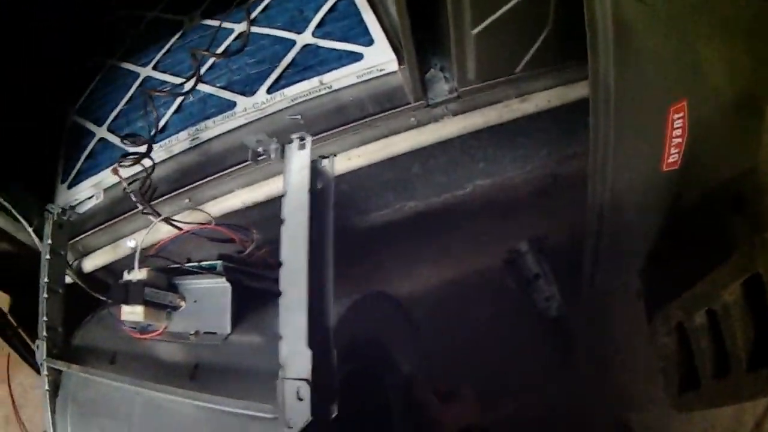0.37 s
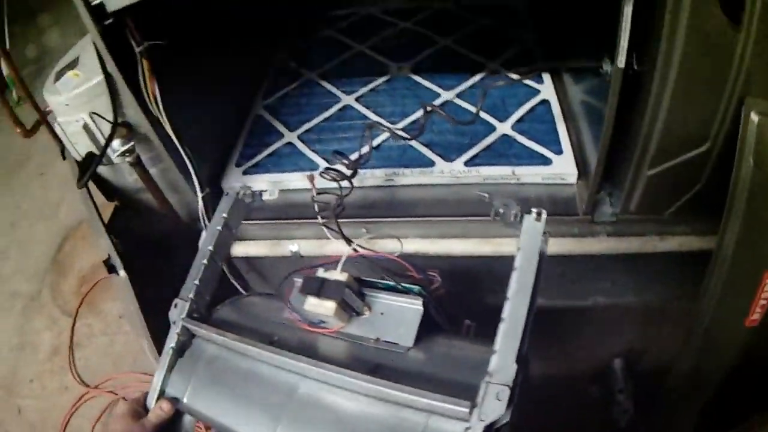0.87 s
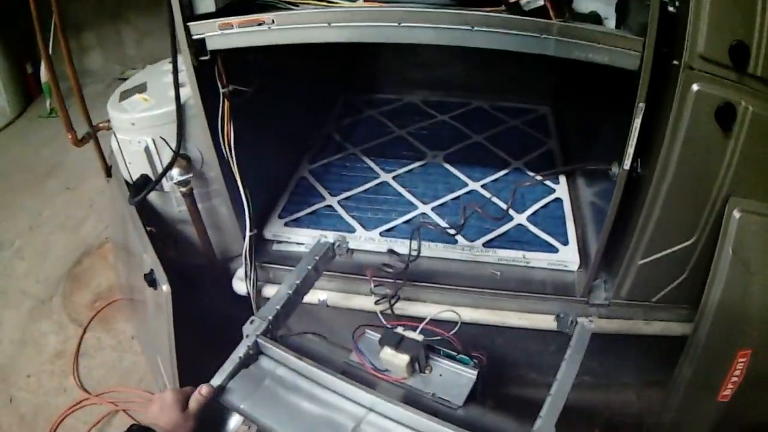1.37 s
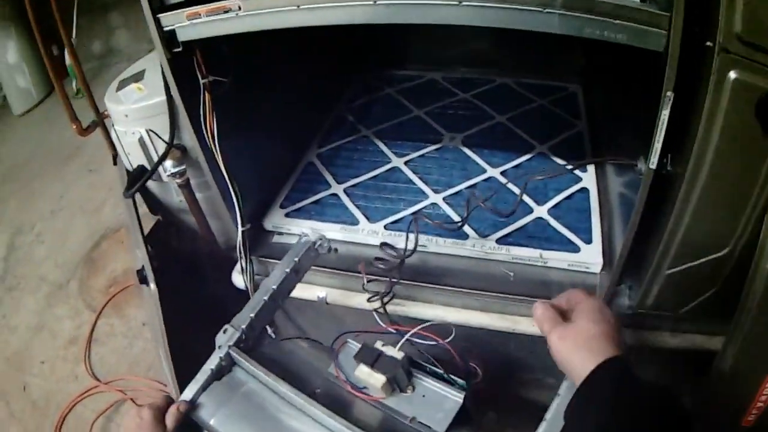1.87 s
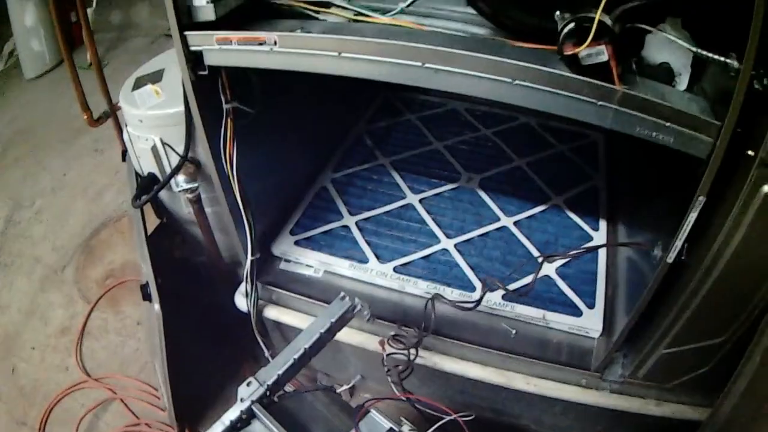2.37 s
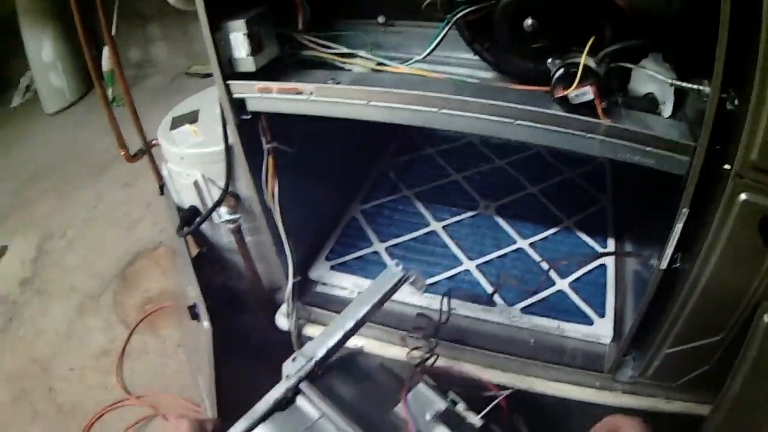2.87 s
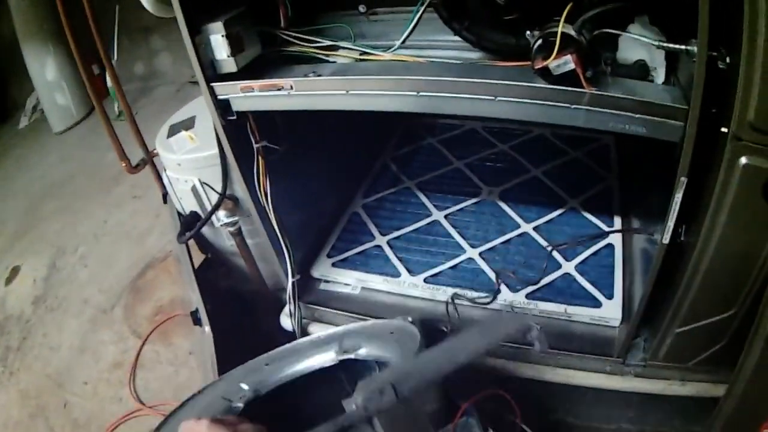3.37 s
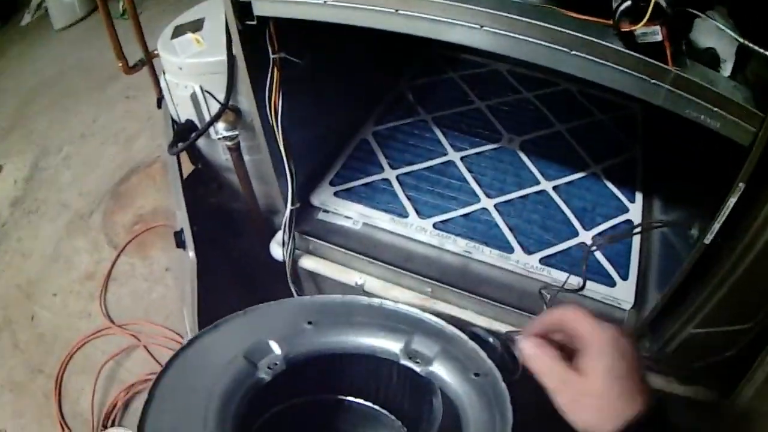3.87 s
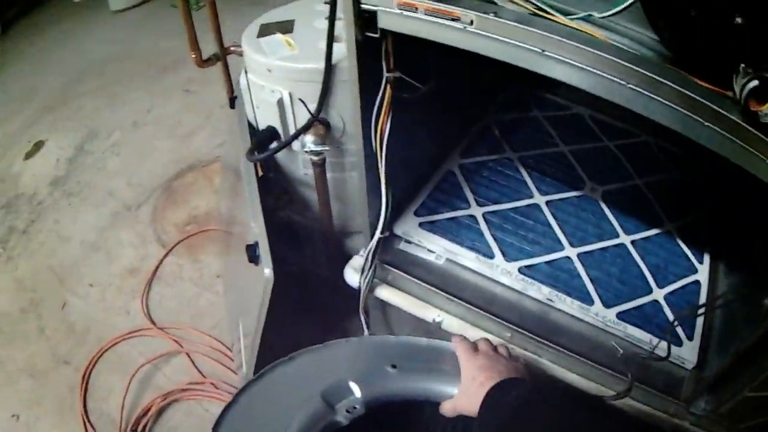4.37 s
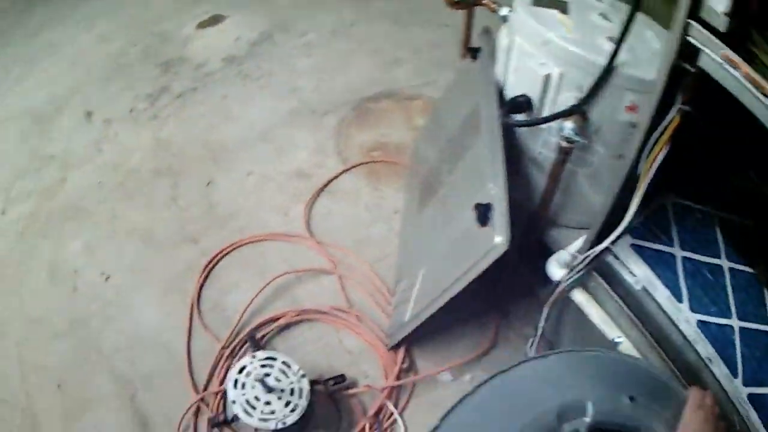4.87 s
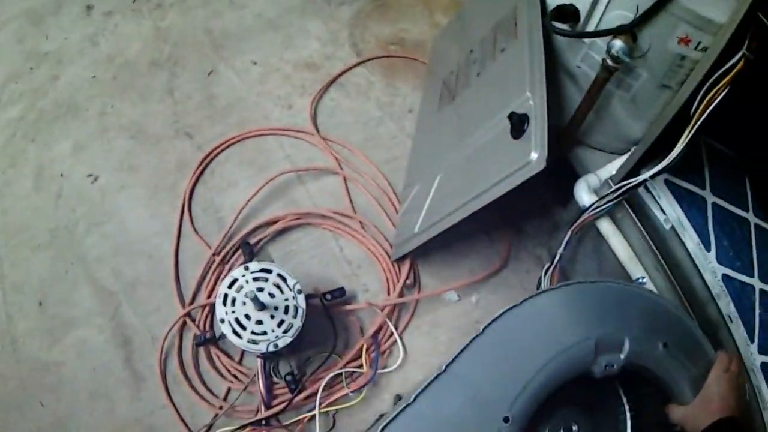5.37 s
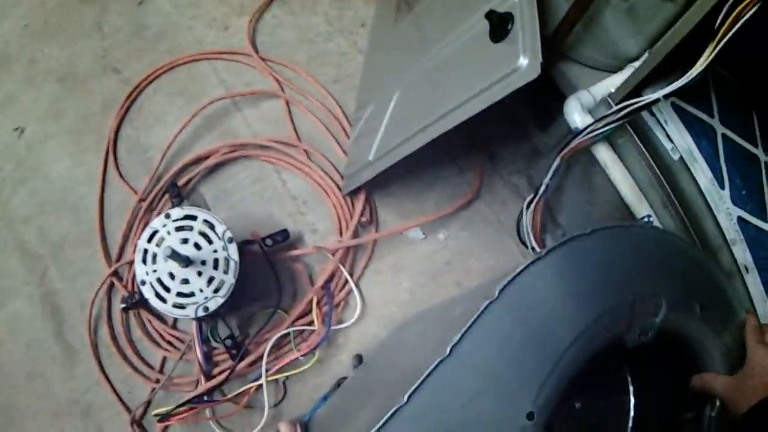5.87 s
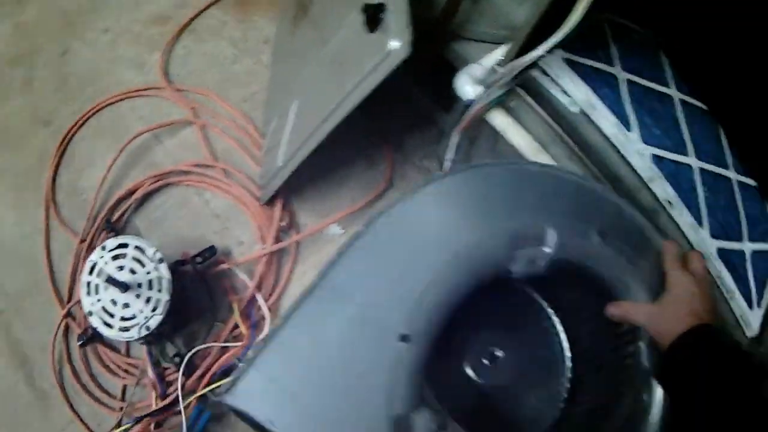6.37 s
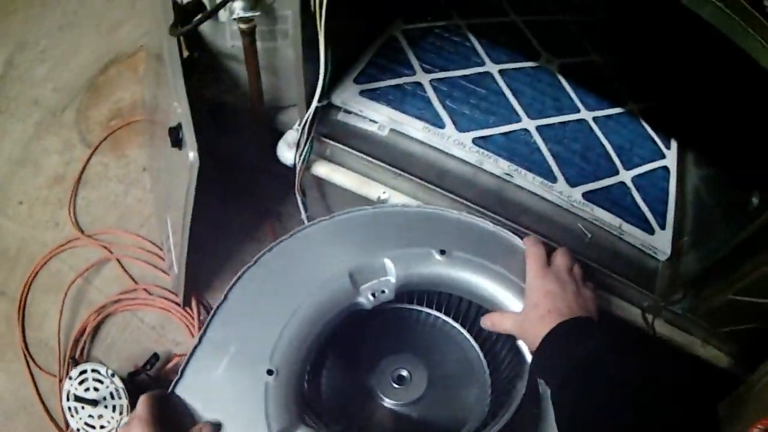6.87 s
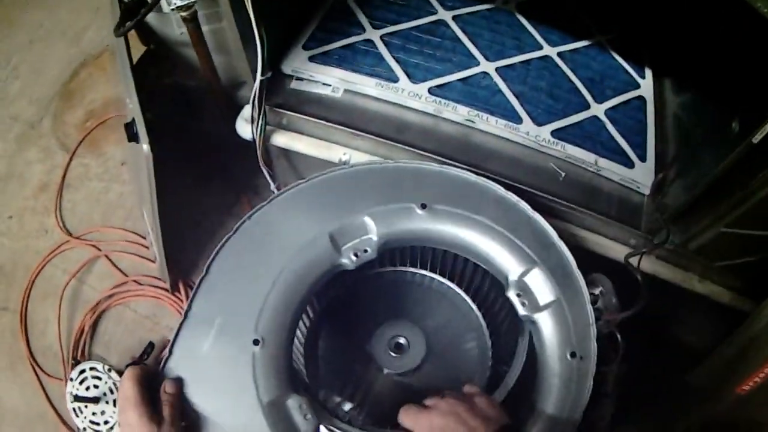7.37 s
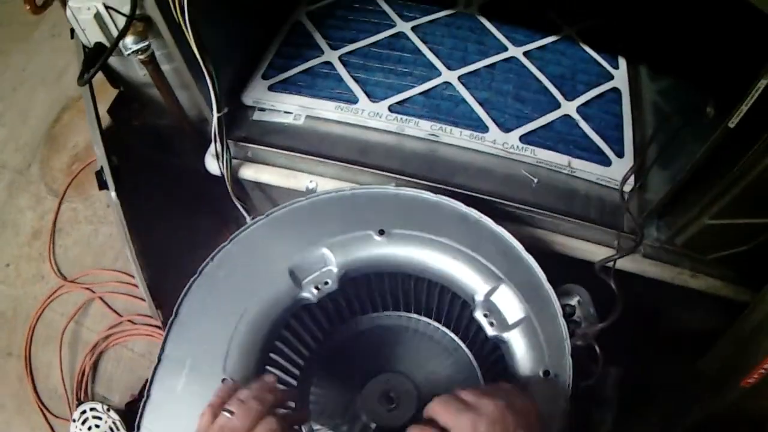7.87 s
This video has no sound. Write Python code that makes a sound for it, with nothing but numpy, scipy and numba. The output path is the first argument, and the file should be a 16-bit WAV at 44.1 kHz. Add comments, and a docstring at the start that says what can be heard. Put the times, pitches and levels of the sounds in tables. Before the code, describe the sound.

Hollow sheet metal handled close to a small body-worn camera on a concrete basement floor. Soft taps give way to isolated bright clanks, then a heavy, ringing set-down. A near-quiet gap follows, then a cluster of knocks with dragging, another strong bang, small bright ticks, a short metallic squeal and continuous uneven rattling. The hard room rings on behind faint hiss and thin whine.

```python
"""A concrete basement floor, where a sheet-metal blower housing is tipped, set down, dragged and rocked.
Knocks are short chatters of noise contacts coloured by the panels; drags are denser, stuttering contacts.
Single faces boom as decaying sines; a sliding edge squeals in rough partials.
Panel modes and a hard room ring on behind.
A small body-worn camera hears it through a narrow port, over its own hiss and whine."""
import sys
import numpy as np
from scipy import signal
from scipy.fft import rfft, irfft
from scipy.io import wavfile
from scipy.ndimage import uniform_filter1d, minimum_filter1d
from numba import njit

SR = 44100
rng = np.random.default_rng(int(sys.argv[2]) if len(sys.argv) > 2 else 0)


def materialize(psi):
    """Save the field psi as 16-bit PCM at rate SR to the path in sys.argv[1].

    A 1-D psi becomes a single channel; in a 2-D psi each row is a channel.
    """
    bounded = np.clip(np.atleast_2d(psi).T, -1, 1)
    quanta = np.round(bounded * 32767).astype(np.int16)
    wavfile.write(sys.argv[1], SR, quanta)


def voltage_ratio(level):
    """Linear amplitude factor for a level in decibels (scalar or array-like)."""
    return 10 ** (np.asarray(level, float) / 20)


N = 352800
BLOCK = 8192  # samples in one knock or squeal

# broad colour of the big panels: hz, relative_db
PANEL = [(40, -63), (150, -12.5), (300, -6), (600, -3.5), (1000, -3), (1600, -4), (2100, -14), (2600, -24),
         (3500, -78)]
# ringing of the edges, a band the port lifts: hz, relative_db
EDGE = [(2000, -41), (2600, -7.5), (3200, 0), (3800, -4), (4500, -18), (6000, -37)]
# bright ticks of hard contact: hz, relative_db
TICK = [(3500, -30.5), (5000, 3), (7000, -2.5), (10000, -4), (12500, -11)]


def level(x, db):
    """Scale to an rms level."""
    return x * voltage_ratio(db) / np.sqrt(np.mean(x ** 2))


def shape(table, size):
    """Gain on the frequency bins, unit power, from (hz, db) points on a log axis."""
    hz, db = np.transpose(table)
    bins_hz = np.fft.rfftfreq(size, 1 / SR)
    gain = voltage_ratio(np.interp(np.log(bins_hz + 1), np.log(hz), db))
    return gain / np.sqrt(np.mean(gain ** 2))


def colour(x, table):
    """Filter a full-length signal by a spectrum."""
    return irfft(rfft(x) * shape(table, N), N)


def contacts(size, spread_db):
    """Noise whose samples have heavy-tailed sizes: many light touches, a few hard ones."""
    hardness = np.minimum(rng.exponential(size=size), 4)
    return level(rng.standard_normal(size) * voltage_ratio(spread_db * hardness), 0)


def wander(size, span):
    """Smooth chance of unit rms that holds for about span samples."""
    once = uniform_filter1d(rng.standard_normal(size), span)
    return level(uniform_filter1d(once, span), 0)


def add(track, start_s, x):
    """Mix a sound in at a time."""
    i = int(start_s * SR)
    track[i:i + len(x)] += x[:N - i]


@njit
def resonate(x, hz, sharpness):
    """State-variable band-pass of gain 1 whose centre moves."""
    y, band, low = np.empty(len(x)), 0., 0.
    for i in range(len(x)):
        g = np.tan(np.pi * hz[i] / SR)
        v = (band + g * (x[i] - low)) / (1 + g * (g + 1 / sharpness))
        band, low, y[i] = 2 * v - band, low + 2 * g * v, v / sharpness
    return y


def hiss():
    """Quiet room air and the camera's hiss as coloured noise, its faint whine as steady sines."""
    # noise density: hz, relative_db
    hiss_spectrum = [(18, -46), (30, -3), (38, -13), (75, -3.5), (130, -9), (786, -12.5), (1150, -24),
                     (1270, -11.5), (2650, -28), (3240, -18.5), (5110, -30.5), (9880, -30), (12700, -35),
                     (16500, -65), (22000, -120)]
    # whine: pitch_hz, rms_db
    whine_tones = [(6379, -88), (9580, -78.5)]
    t = np.arange(N) / SR
    whine = sum(voltage_ratio(db) * np.sqrt(2) * np.sin(2 * np.pi * hz * t) for hz, db in whine_tones)
    return level(colour(rng.standard_normal(N), hiss_spectrum), -61.5) + whine


def scrape():
    """Dense uneven contacts of metal on grit, in stutters of a few hundredths of a second."""
    # one curve per stroke of dragging or shifting: time_s, level_db, loudest_panels_hz
    strokes = [
        [(0.0, -49.5, 690), (0.27, -73, 640), (0.6, -72, 890), (1.26, -66.5, 820), (1.8, -70, 1040),
         (2.38, -60.5, 1100)],
        [(4.57, -71, 810), (4.628, -49.5, 900), (4.73, -42.5, 800), (5.02, -63.5, 750)],
        [(5.05, -62, 1020), (5.22, -38.5, 1100), (5.6, -32.5, 980)],
        [(5.95, -46.5, 781), (6.086, -48, 810), (6.21, -57.5, 478), (6.528, -41, 670), (6.85, -52.5, 820)],
        [(6.95, -21.5, 1650), (7.042, -31.5, 1330), (7.224, -38, 520), (7.65, -30.5, 1050), (8.0, -67, 990)],
    ]
    # the shell drumming as it is moved: hz, relative_db
    rumble = [(30, -23.5), (90, 9), (160, 9.5), (260, -11.5), (500, -66.5)]
    drum_db, edge_db, tick_db = -21.5, -15, -20.5  # tick re edge
    t = np.arange(N) / SR
    force = sum(voltage_ratio(np.interp(t, *np.transpose(stroke)[:2], -120, -120)) for stroke in strokes)
    time_s, _, loudest_hz = np.vstack(strokes).T

    step = SR // 50
    stutter_steps = np.repeat(rng.uniform(-1, 1, N // step + 1), step)
    stutter = voltage_ratio(6 * uniform_filter1d(stutter_steps, step // 2)[:N])
    grit = level(contacts(N, spread_db=1.6) * stutter, 0)

    panels = colour(grit, PANEL)
    nearest = resonate(panels, np.interp(t, time_s, loudest_hz), 1.77)  # panels nearest the dragged edge
    panels = 0.5 * panels + 0.68 * nearest
    drum = voltage_ratio(drum_db) * colour(grit, rumble)
    edge = colour(grit, EDGE) + voltage_ratio(tick_db) * colour(grit, TICK)
    return force * (panels + drum + voltage_ratio(edge_db) * edge)


def sheet_modes(bins_hz, count):
    """Close resonances of the thin sheet, unevenly spaced; rows of complex gain on the bins."""
    sharpness = 40
    place = (np.arange(count) + rng.uniform(size=count))[:, None] / count
    hz = 420 * (11000 / 420) ** place
    return 1 / (1 + 2j * sharpness * (bins_hz - hz) / hz)


def chatter_envelope(t, rise_s, hold_s):
    """Quick rise, slow decay while the contacts hold, then a fast end."""
    ending = 1 + np.exp((t - hold_s) / 0.014)
    return (1 - np.exp(-t / rise_s)) * np.exp(-t / 0.097) / ending


def knocks():
    """Chatters of contacts that hold, then die; each favours some panels and has its own brightness."""
    # blows: time_s, level_db, loudest_panel_hz, tick_db (brightness re the panels), chatter_s
    blows = [(0.001, -30.5, 550, -53, 0.071), (0.426, -28.5, 1110, -26, 0.026),
             (0.642, -41, 608, -14, .026), (0.789, -37, 595, -13, 0.067), (0.885, -32, 930, -19, .077),
             (0.949, -34.5, 297, -25, 0.15), (1.188, -42.5, 490, -35, 0.14), (1.307, -37, 800, -12, 0.073),
             (1.449, -43.5, 1050, -22, 0.11), (1.9, -41.5, 550, -18, 0.11), (1.999, -38, 571, -17, 0.021),
             (2.103, -40.5, 1410, -25, 0.025), (2.235, -46.5, 1040, -6, 0.069),
             (2.3, -43, 1500, -9.5, 0.032), (2.4, -7, 1800, -11, 0.031), (2.556, -13, 1310, -12.5, 0.015),
             (2.757, -34.5, 1070, -17, 0.17), (2.846, -27, 870, -8.5, 0.04),
             (3.027, -10, 935, -38.5, 0.049), (3.149, -9, 1070, -43, 0.056), (3.251, -30.5, 760, -12, .032),
             (3.322, -18.5, 500, -26, 0.14), (3.429, -17.5, 501, -20, 0.021),
             (3.499, 2.5, 1160, -21.5, 0.055), (3.511, 8, 810, -14.5, 0.0085), (3.539, 1, 875, -42, 0.082),
             (4.754, -27, 686, -27, 0.045), (5.025, -2, 1420, -28, 0.047), (5.157, -9, 600, -29, 0.029),
             (5.177, -8.5, 1500, -24, 0.022), (5.236, -11, 920, -17.5, 0.021),
             (5.36, -11.5, 820, -22, 0.046), (5.468, -5.5, 1240, -34.5, 0.038),
             (5.536, -8.5, 785, -58, 0.021), (5.596, -6.5, 921, -42.5, 0.13),
             (5.608, 5.5, 1140, -30, 0.0081), (6.037, -35, 1090, -5, 0.049), (6.08, -29.5, 1047, -7, 0.016),
             (6.216, -36, 1580, 5, .03), (6.247, -31.5, 1530, 7, .06), (6.282, -15, 463, -10.5, 0.047),
             (6.398, -40, 560, 12.5, 0.018), (6.45, -8, 430, -15, 0.0092), (6.501, -13.5, 820, -26, 0.065),
             (6.555, -7, 450, -4.5, 0.025), (6.867, -9, 1640, -15.5, 0.043),
             (6.878, -7.5, 1520, -14.5, 0.098), (6.921, -6.5, 1624, -21, 0.05),
             (7.062, -6.5, 900, -29.5, 0.025), (7.091, -4, 452, -41, 0.0062), (7.17, -13, 452, -34, 0.042),
             (7.209, -10.5, 421, -38, .014), (7.281, -10, 1370, -37, 0.015), (7.379, -17, 1100, -29, 0.027),
             (7.473, -15.5, 438, -31, 0.041), (7.552, -25, 444, -42, 0.1),
             (7.601, -10.5, 1220, -29.5, 0.15), (7.672, -8, 1160, -27.5, 0.33),
             (7.714, -3, 1260, -19.5, 0.034), (7.744, -6.5, 960, -30, 0.18),
             (7.773, -2.5, 1300, -25.5, 0.046)]
    crest_db = 17  # allowance for the peak of a chatter above its rms
    thud_rise_s, grate_rise_s, grate_share = 0.0027, 0.0036, 0.94  # share of the chatter's length
    edge_base_db, edge_per_tick_db = -2.5, 0.24
    # gripped and tipped over, the housing has duller edges
    tipping_start_s, tipping_end_s, tipping_edge_db = 3.0, 3.47, -4.5
    sheet_db, sheet_scatter_db = 1.5, 7
    out, t = np.zeros(N), np.arange(BLOCK) / SR
    bins_hz = np.fft.rfftfreq(BLOCK, 1 / SR)
    modes = sheet_modes(bins_hz, count=50)
    for time_s, db, hz, tick_db, chatter_s in blows:
        near = np.exp(-(np.log((bins_hz + 1) / hz) / 0.36) ** 2)  # panels near the blow
        body = shape(PANEL, BLOCK) * (1 + voltage_ratio(-1.5) * near)
        edge_db = edge_base_db + edge_per_tick_db * tick_db
        if tipping_start_s < time_s < tipping_end_s:
            edge_db += tipping_edge_db
        bright = voltage_ratio(edge_db) * shape(EDGE, BLOCK) + voltage_ratio(tick_db) * shape(TICK, BLOCK)

        thud_envelope = chatter_envelope(t, thud_rise_s, chatter_s)
        grate_envelope = chatter_envelope(t, grate_rise_s, grate_share * chatter_s)
        thud = rfft(contacts(BLOCK, spread_db=2.36) * thud_envelope) * body
        grate = rfft(contacts(BLOCK, spread_db=2.7) * grate_envelope) * bright

        mode_db = sheet_db + sheet_scatter_db * rng.uniform(-2, 1, len(modes))
        sheet = 1 + voltage_ratio(mode_db) @ modes
        sheet = sheet / np.sqrt(np.mean(np.abs(sheet) ** 2))
        knock = irfft((thud + grate) * sheet, BLOCK)
        add(out, max(time_s - .002, 0), voltage_ratio(db - crest_db) * knock)
    return out


def housing(x):
    """The panels ring on after the contacts: convolution with a sum of decaying modes."""
    # panel modes: pitch_hz, relative_db, t60_s
    panel_modes = [(260, -19, 0.34), (361, 5.5, 0.47), (452, -6.5, 0.93), (609.5, 4, 0.74),
                   (677, -16, 0.87), (900, -1.5, .3), (1010, -12.5, 0.24), (1220, -18, .3),
                   (1377, -13.5, 0.78), (1530, 0, 0.2), (1800, -23, .3), (2170, -10, .3),
                   (2900, -0.5, 0.35), (3200, -20.5, .25), (3770, -10, .25), (3770, -13, .25),
                   (5000, -13.5, .3), (5150, -11.5, 0.33)]
    ring_db = -27
    t = np.arange(SR) / SR
    ring = sum(voltage_ratio(db) * np.exp(-np.log(1000) * t / t60_s) * np.sin(2 * np.pi * hz * t)
               for hz, db, t60_s in panel_modes)
    ring = ring / np.sqrt(np.sum(ring ** 2))
    return x + signal.fftconvolve(x, voltage_ratio(ring_db) * ring)[:N]


def room(x):
    """Diffuse tail of third-octave noise bands, building up over a few milliseconds."""
    # reverberation: hz, t60_s, relative_db
    reverberation = [(80, 1.7, 7), (210, 1.59, 4.5), (520, 1.19, -2.5), (1500, 1.083, -2),
                     (3930, 0.91, -1.5), (10300, 0.39, -3.5)]
    room_db = -11.5
    t, tail = np.arange(2 * SR) / SR, 0
    hz, t60_s, db = np.transpose(reverberation)
    for centre_hz in 50 * 2 ** np.arange(0, 8.1, 1 / 3):
        edges_hz = [centre_hz * 2 ** (-1 / 6), centre_hz * 2 ** (1 / 6)]
        band = signal.butter(2, edges_hz, "band", fs=SR, output="sos")
        decay_s = np.interp(np.log(centre_hz), np.log(hz), t60_s)
        band_db = np.interp(np.log(centre_hz), np.log(hz), db)
        noise = signal.sosfilt(band, rng.standard_normal(len(t)))
        tail = tail + voltage_ratio(band_db) * noise * np.exp(-np.log(1000) * t / decay_s)
    tail = tail * (1 - np.exp(-t / 0.0031))
    tail = tail / np.sqrt(np.sum(tail ** 2))
    return x + voltage_ratio(room_db) * signal.fftconvolve(x, tail)[:N]


def notes():
    """One decaying mode at a time; level and pitch waver at random, so each tone is slightly rough."""
    # single faces left ringing by a blow or by the sheet popping: start_s, level_db, face
    rings = [(0.049, -48.5, "F"), (0.94, -45.5, "F"), (2.391, -36, "A"), (2.395, -43, "C"),
             (2.469, -40.5, "B"), (2.469, -37.5, "D"), (2.669, -47.5, "D"), (2.76, -39.5, "L"),
             (2.856, -37, "J"), (3.023, -40, "E"), (3.028, -21.5, "K"), (3.169, -25, "J"),
             (3.327, -38.5, "B"), (3.382, -38, "A"), (3.429, -35, "E"), (3.489, -21.5, "B"),
             (3.498, -16.5, "D"), (3.538, -5.5, "J"), (3.679, -29, "D"), (4.755, -31.5, "I"),
             (4.899, -46, "I"), (4.957, -50, "B"), (5.037, -10, "K"), (5.042, -42, "D"), (5.181, -25, "N"),
             (5.212, -32, "D"), (5.027, -24, "P"), (5.235, -48.5, "Q"), (5.362, -30.5, "P"),
             (5.607, -37.5, "P"), (5.361, -38, "C"), (5.453, -28.5, "C"), (5.502, -24.5, "C"),
             (5.609, -0.5, "L"), (5.678, -22.5, "G"), (5.749, -29.5, "H"), (6.041, -54.5, "Q"),
             (6.28, -23, "G"), (6.447, -29, "G"), (6.449, -35.5, "E"), (6.449, -26.5, "N"),
             (6.524, -25, "C"), (6.544, -31.5, "G"), (6.555, -41, "Q"), (6.66, -47.5, "Q"),
             (6.97, -23.5, "O"), (7.09, -32, "O"), (7.473, -36, "P"), (7.773, -20.5, "P"),
             (7.036, -20, "C"), (7.212, -21, "G"), (7.282, -38, "D"), (7.525, -30.5, "D"),
             (7.555, -26, "G"), (7.611, -13, "M"), (7.625, -28, "G"), (7.683, -18, "M"),
             (7.721, -22.5, "D"), (7.726, -23.5, "H"), (7.778, -8.5, "L")]
    # faces and blades that can ring alone, low to high: face, pitch_hz, t60_s
    faces = [("A", 84, .3), ("B", 110, .5), ("C", 146, .32), ("D", 203, .34), ("E", 240, .4),
             ("F", 295, .45), ("G", 455, .24), ("H", 545, .3), ("I", 748, .2), ("J", 870, .13),
             ("K", 1015, .14), ("L", 1093, .085), ("M", 1190, .2), ("N", 1450, .18), ("O", 3100, .35),
             ("P", 3500, .2), ("Q", 5000, .45)]
    out, t = np.zeros(N), np.arange(SR) / SR
    mode = {face: (hz, t60_s) for face, hz, t60_s in faces}
    for start_s, db, face in rings:
        hz, t60_s = mode[face]
        push = 1 - np.exp(-t / (0.001 + 0.35 / hz))
        waver = voltage_ratio(6.9 * wander(SR, span=600) * (1 - np.exp(-t / 0.16)))
        decay = np.exp(-np.log(1000) * t / t60_s)
        phase = 2 * np.pi * np.cumsum(hz * (1 + .018 * wander(SR, span=70))) / SR
        add(out, start_s, voltage_ratio(db) * push * waver * decay * np.sin(phase))
    return out


def squeal():
    """Stick-slip locks onto a panel resonance for a moment: rough partials that swell and fade."""
    # squeals of a sliding edge: peak_s, level_db, pitch_hz (loudest partial), glide_hz_per_s, half_length_s
    squeals = [(6.176, -59, 3550, -3000, 0.019), (6.213, -47, 3300, -4000, 0.01),
               (6.265, -45.5, 3100, -4, 0.018), (6.416, -47, 3160, -2000, 0.012),
               (6.892, -17.5, 3096, 7, 0.01), (6.936, -7, 3134, -17, 0.016), (6.968, -21.5, 3166, 3, 0.011)]
    # partials: pitch_multiple, relative_db
    partials = [(0.252, -9), (.5, -5.5), (0.969, -5), (1, 1.5), (1.12, -10), (1.19, -10.5)]
    out, t = np.zeros(N), (np.arange(BLOCK) - BLOCK // 2) / SR
    for peak_s, db, hz, glide, half_s in squeals:
        pitch_hz = (hz + glide * t) * (1 + .014 * wander(BLOCK, span=50))
        phase = 2 * np.pi * np.cumsum(pitch_hz) / SR
        swell = np.exp(-.5 * np.abs(t / half_s) ** 3)
        for multiple, part_db in partials:
            rough = 1 + 0.6 * wander(BLOCK, span=150)
            add(out, peak_s + t[0], voltage_ratio(db + part_db) * swell * rough * np.sin(multiple * phase))
    return out


def scene():
    """Clatter rings the housing and feeds the room in full; the tones stay mostly dry."""
    clatter = housing(knocks() + scrape())
    tones = notes() + squeal()
    room_share = voltage_ratio(-12)  # of the tones; their direct sound stays whole
    mix = room(clatter + room_share * tones) + (1 - room_share) * tones + hiss()
    return mix[None]


def band_limit(x):
    """A steep low-pass at the top of the band."""
    return signal.sosfilt(signal.butter(12, 12870, fs=SR, output="sos"), x)


def record(dry):
    """A fast limiter holds the loudest peaks to full scale, then the deepest bass and the top are cut."""
    top_cut = signal.ellip(8, .2, 60, 12800, fs=SR, output="sos")
    bass_cut = signal.butter(2, 30, "high", fs=SR, output="sos")
    limit_gain = minimum_filter1d(1 / np.maximum(np.abs(dry), 1), size=241)
    held = dry * uniform_filter1d(limit_gain, size=241)
    finished = signal.sosfilt(np.vstack([top_cut, bass_cut]), held)
    return band_limit(finished)


dry = scene()
out = record(dry)
materialize(out)
```